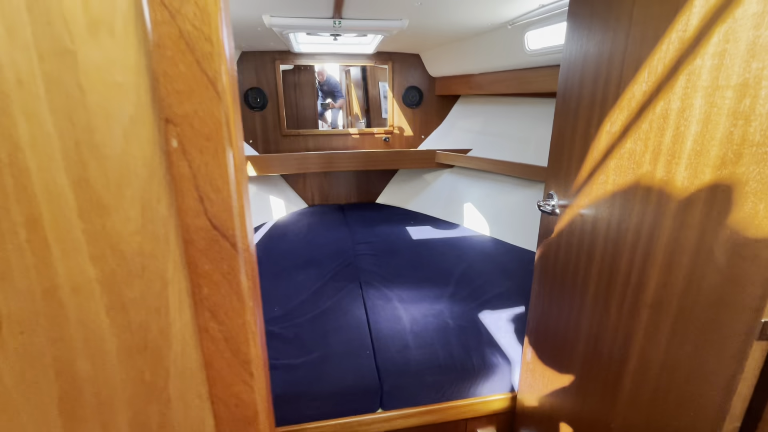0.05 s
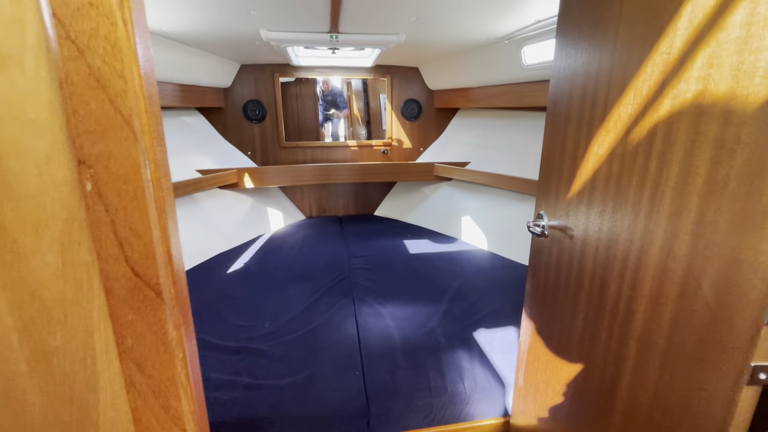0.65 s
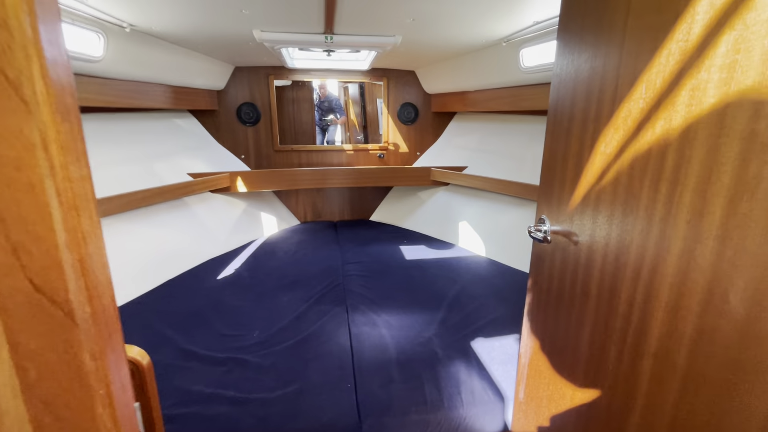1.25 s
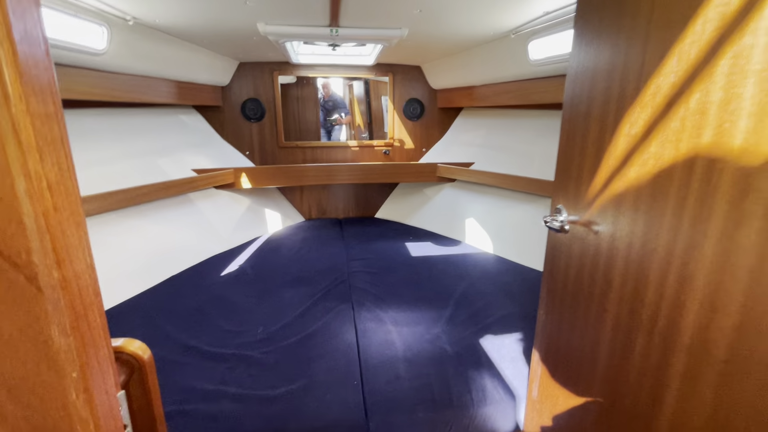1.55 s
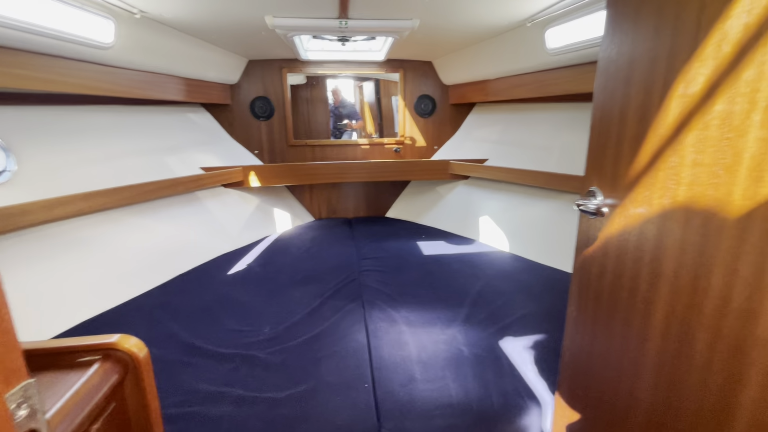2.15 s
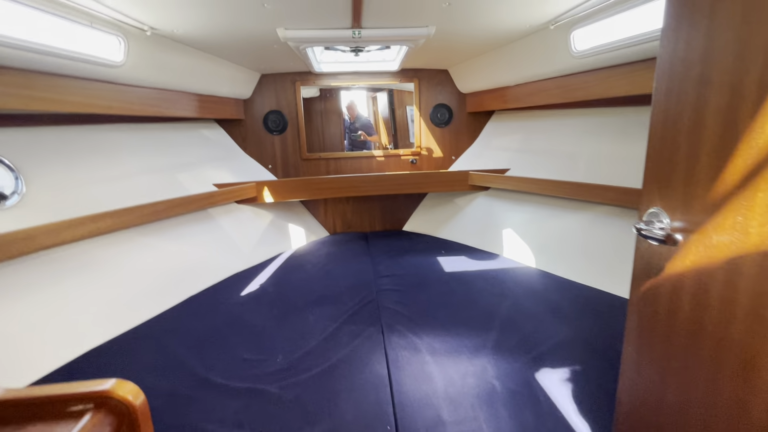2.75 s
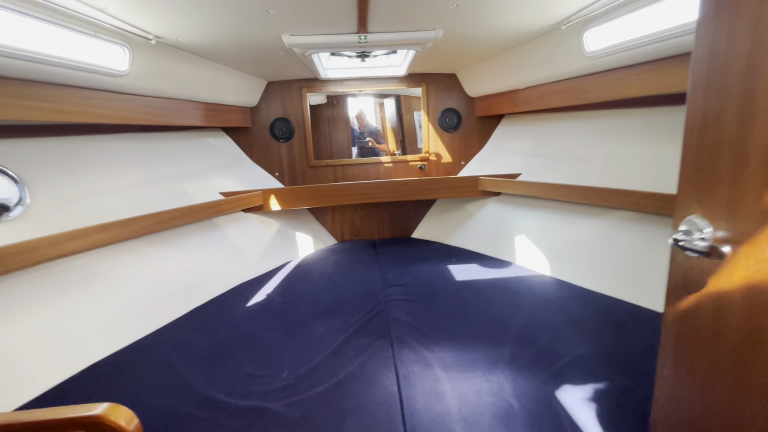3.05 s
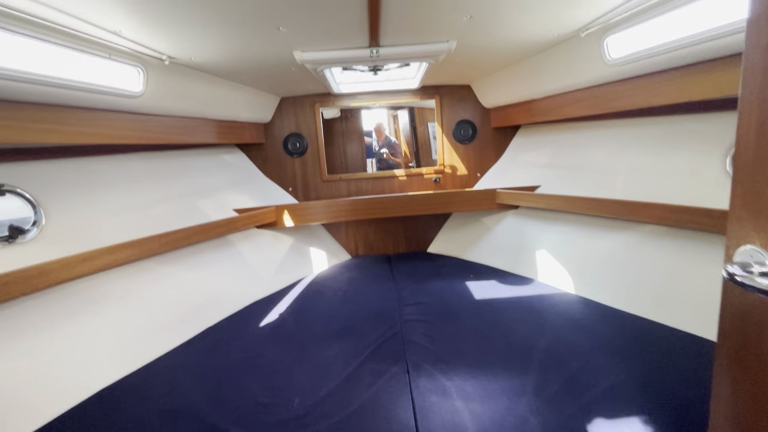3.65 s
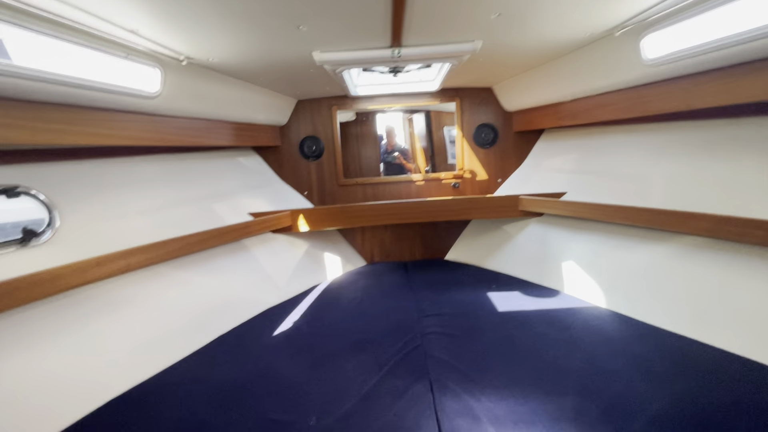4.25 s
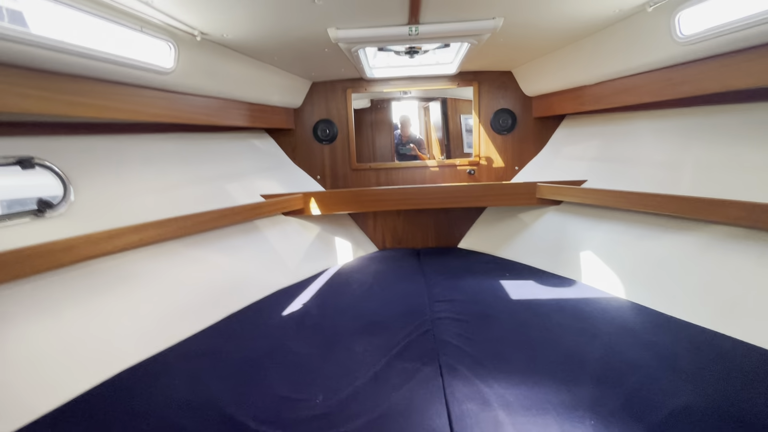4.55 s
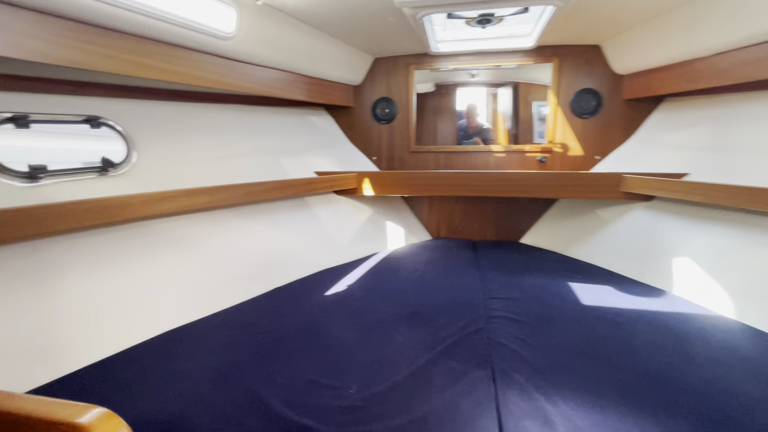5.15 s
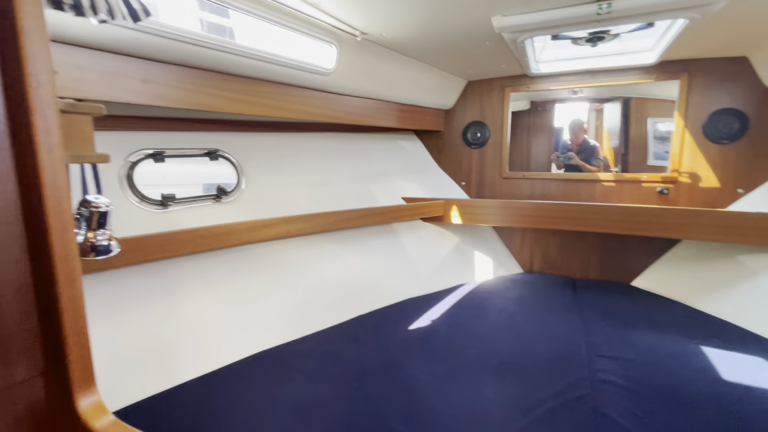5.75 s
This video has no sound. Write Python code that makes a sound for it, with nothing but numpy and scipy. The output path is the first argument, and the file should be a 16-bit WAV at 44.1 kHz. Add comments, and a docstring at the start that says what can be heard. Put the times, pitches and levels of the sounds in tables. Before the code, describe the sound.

Clothes rub through a narrow wooden doorway, with hollow footsteps, panel knocks and clacking boards over a faint low rumble.

```python
"""Squeezing into a boat's fore cabin

Someone edges through a narrow doorway into the wood-panelled cabin of a moored boat, heard close up on
a camera's two microphones. Clothes drag along the door frame and make the panel drone and judder;
steps thud on the hollow floor and loose boards clack. Right at the microphones, fingers tick and shift
on the camera body. Underneath, the hull rumbles as weight shifts."""
import sys
import numpy as np
from scipy import signal
from scipy.fft import rfft, irfft, next_fast_len
from scipy.io import wavfile

SR = 44100
rng = np.random.default_rng(int(sys.argv[2]) if len(sys.argv) > 2 else 0)


def store_wav(level_fs):
    """Save 16-bit WAV to argv[1]."""
    pcm = np.round(np.clip(np.atleast_2d(level_fs), -1, 1) * 32767)
    wavfile.write(sys.argv[1], SR, pcm.T.astype(np.int16))


N = 264148
TIME = np.arange(N) / SR

# decay of the cabin's echoes: (frequency [Hz], time to fall 60 dB [s])
CABIN_DECAY = [(150, 0.43), (400, 0.18), (1000, 0.17), (2800, 0.15), (8000, 0.28)]
# spectra of the hull's rumble and the room tone: (frequency [Hz], relative level [dB])
HULL_COLOUR = [(20, -39), (33, -9), (45, -2), (57, 8.5), (76, -4.5), (98, -5), (135, 3.5), (190, -18),
               (600, -51)]
ROOM_TONE_COLOUR = [(200, -6), (700, -5.5), (3200, -20.5), (13000, -24)]
# leans that load the hull: (middle [s], half length [s], relative rumble [dB])
LEANS = [(0.184, 0.078, -48.5), (1.223, 0.67, -61.5), (3.305, 0.82, -56), (4.826, 0.16, -58),
         (5.706, 0.19, -58)]
# strokes of clothing along the woodwork, with relative levels as each ends:
# (start [s], end [s], attack [s], swell [dB], rub [dB], fibre hiss [dB], panel drone [dB])
STROKES = [(0, 0.19, .03, 12.5, -66, -66.5, -46.5), (0.277, 0.323, 0.0056, -3.5, -54, -73, -62),
           (0.357, 0.403, 0.063, 1, -51, -55.5, -45), (0.528, 0.562, 0.024, 8, -63.5, -65.5, -57),
           (0.669, 0.87, 0.06, -2, -61.5, -65, -60.5), (0.958, 1.126, 0.11, 1, -54, -57.5, -53),
           (1.18, 1.386, 0.0033, 7, -47.5, -50.5, -43), (1.452, 1.604, 0.024, 0.5, -39.5, -55, -34),
           (1.693, 1.794, 0.17, -5.5, -43.5, -47.5, -39.5), (1.826, 1.937, 0.08, 12, -57, -61, -45),
           (2.106, 2.107, 0.067, 0.5, -44.5, -54.5, -38.5), (2.34, 2.657, 0.049, -1.5, -69.5, -67, -63.5),
           (2.7, 2.897, 0.11, -3.5, -60.5, -64, -55.5), (2.942, 2.947, 0.054, -7, -62.5, -54.5, -50.5),
           (3.047, 3.067, 0.098, 4.5, -47, -59, -38), (3.275, 3.333, 0.035, -1.5, -45.5, -60, -46),
           (3.876, 4.009, 0.24, -16.5, -87, -66, -76), (4.104, 4.207, 0.039, 6.5, -58, -72.5, -62.5),
           (4.64, 4.818, 0.75, 11.5, -61.5, -71, -55.5), (5.469, 5.622, 0.024, -6.5, -64.5, -73, -65),
           (5.702, 5.814, 0.038, 0.5, -55, -68.5, -59)]
# spectra of the cloth's rub, its fibres and their tips alone: (frequency [Hz], relative level [dB])
RUB_COLOUR = [(200, -67), (400, -4), (600, 2.5), (1100, 5), (1450, 1.5), (2200, 0), (2900, -14.5),
              (4500, -17.5), (9000, -26)]
FIBRE_COLOUR = [(1200, 1.5), (2600, 7), (3600, 3), (5200, 1), (6600, 2.5), (7700, -4), (10000, -11),
                (13000, -30)]
TIPS_COLOUR = [(1500, 2), (4500, -6.5), (7600, -0.5), (13000, -13.5)]
# door frame modes: (frequency [Hz], gain [dB])
FRAME_MODES = [(497, -3.5), (631, -1), (780, -6.5), (904, -3), (1053, -1.5), (1158, -8.5), (1367, -2),
               (1860, -5)]
# door panel modes: (frequency [Hz], width [Hz], gain [dB])
PANEL_MODES = [(236.5, 20, -1.5), (257, 39, -5.5), (306.9, 17.8, 0.5), (330.5, 48, -20.5), (381, 24, -10)]
# tilt of the panel's drone: (frequency [Hz], relative level [dB])
DRONE_COLOUR = [(80, 4.5), (200, -1.5), (1200, -3.5), (6000, -19)]
# bumps against the panelling: (time [s], pitch [Hz], level [dB])
BUMPS = [(0.045, 231, -44.5), (0.356, 323, -39.5), (0.8311, 362, -27), (0.839, 281, -22.5),
         (0.932, 343, -31.5), (1.918, 240, -31), (1.953, 280, -30.5), (2.364, 269, -43.5),
         (3.066, 336, -33), (3.261, 238, -33), (3.363, 233, -33.5), (3.394, 202, -32.5)]
# faint high clicks: (time [s], level [dB])
CLICKS = [(0.117, -55), (0.935, -60), (2.592, -62), (4.283, -66), (4.363, -57), (4.628, -49.5)]
# short scrapes: (time [s], half length [s], middle tone [Hz], level [dB])
SCUFFS = [(0.557, 0.015, 9500, -66), (0.833, 0.0022, 980, -40.5), (0.933, 0.0062, 1100, -42.5),
          (1.706, 0.049, 436, -36), (1.732, 0.018, 1090, -36), (1.802, 0.028, 606, -39),
          (2.111, 0.016, 956, -34.5), (3.298, 0.0068, 1210, -36), (3.318, 0.0069, 1200, -33),
          (3.389, 0.0073, 535, -41.5)]
# spectrum of a scrape: (frequency [times its middle tone], relative level [dB])
SCUFF_COLOUR = [(0.25, -28), (0.74, -10), (1, 0), (1.18, -8), (2, -27), (10, -43)]
# footfalls: (time [s], level [dB], brightness [dB/octave])
STEPS = [(.838, -28, 2.5), (1.548, -29.5, 9), (2.163, -37.5, 0), (2.203, -46, -7), (2.806, -44, -14.5),
         (3.444, -31, 13), (3.709, -52, -25), (3.761, -33, 12), (4.736, -35.5, -10)]
# modes of the hollow floor: (frequency [Hz], gain [dB], swell time [s])
FLOOR_MODES = [(69.5, -12, 0.018), (147.5, 3.5, 0.0047), (238, -9, 0.0031)]
# taut cloth chatters along the frame: (start [s], end [s])
CHATTERS = [(0.85, 1.57), (2.619, 2.7)]
# fabric catches on the frame as the squeeze begins: (time [s], level [dB])
CREAKS = [(1.065, -46), (1.114, -54), (1.278, -43), (1.317, -56), (1.339, -43), (1.36, -40.5), (1.414, -39)]
# spectrum of those creaks: (frequency [Hz], relative level [dB])
CREAK_COLOUR = [(300, -41), (900, 5), (2000, 3), (3200, -19), (13000, -31)]
# the panel judders where the squeeze is tightest: (time [s], pitch [Hz], level [dB])
JUDDERS = [(1.516, 245, -22), (1.554, 240, -26.5), (1.587, 301, -18.5), (1.615, 293, -19.5),
           (1.642, 294, -21.5)]
# hollow finger ticks on the camera body: (time [s], pitch [Hz], level [dB])
TICKS = [(3.411, 784, -40), (4.199, 662, -24), (5.852, 670, -42.5), (5.933, 634, -43.5)]
# clacks of loose boards: (time [s], level [dB], brightness above 1 kHz [dB/octave])
CLACKS = [(3.524, -34, -0.5), (3.797, -40.5, -3), (4.024, -36.5, -2.5), (4.809, -33, -1.9),
          (5.466, -34.5, -1)]
# spectrum of a clack: (frequency [Hz], relative level [dB])
CLACK_COLOUR = [(70, -12), (450, -7.5), (950, -3.5), (1700, -7), (3300, -14.5), (4500, -24.5),
                (7500, -31.5), (13000, -45.5)]
# modes of a loose board and of the camera body: (frequency [Hz], width [Hz], gain [dB])
BOARD_MODES = [(500, 170, -2.5), (780, 10, -1.5), (915, 79, -2.5), (1433, 19, 11), (1787, 50, 1.5),
               (2250, 170, 1.5)]
CASING_MODES = [(637, 270, 3.5), (984, 37, 3), (1950, 220, -3)]
# the left microphone hears more of the treble: (frequency [Hz], left minus right [dB])
MIC_BALANCE = [(300, 1), (1800, -2.5), (3800, 3.5), (7500, 7.5), (12000, -3)]

OPPOSED = np.array([[1], [-1]])  # opposite signs for a pair of channels


def amp(db):
    """Decibels to gain."""
    return 10 ** (np.asarray(db) / 20)


def unit(x):
    """Scale to rms 1."""
    return x / np.sqrt(np.mean(x ** 2))


def at_hz(table, f):
    """Read a table on a log-frequency axis."""
    hz, value = np.transpose(table)
    return np.interp(np.log(f + 1), np.log(hz), value)


def shape(x, response):
    """Filter by a gain that is a function of frequency."""
    size = 2 * next_fast_len(x.shape[-1] // 2 + 1)
    hz = np.arange(size // 2 + 1) * SR / size
    return irfft(rfft(x, size) * response(hz), size)[..., :x.shape[-1]]


def colour(x, table):
    """Filter by a spectrum table and scale to rms 1."""
    return unit(shape(x, lambda hz: amp(at_hz(table, hz))))


def resonate(x, modes):
    """Pass a signal through parallel resonances."""
    return sum(amp(db) * signal.lfilter(*signal.iirpeak(hz, hz / width, fs=SR), x)
               for hz, width, db in modes)


def add(out, start_s, sound):
    """Mix a sound in at its start time."""
    i = int(start_s * SR)
    out[:, i:i + sound.shape[1]] += sound[:, :N - i]


def mic_pair(pair, split_hz, likeness=0.84):
    """Two unrelated signals at two closely spaced microphones: long waves reach both alike."""
    mid, side = shape(pair, lambda hz: np.sqrt(1 + OPPOSED * likeness / (1 + (hz / split_hz) ** 4)))
    return np.array([mid + side, mid - side]) / np.sqrt(2)


def reflections():
    """Dense echoes between the cabin's close panels, at unit energy; the bass lasts longest."""
    t = TIME[:SR // 2]
    noise = mic_pair(rng.standard_normal((2, len(t))), split_hz=290)
    centres, t60s = np.transpose(CABIN_DECAY)
    tail = 0
    for share, t60 in zip(np.eye(len(centres)), t60s):
        band = shape(noise, lambda hz: at_hz(np.c_[centres, share], hz))
        tail += band * amp(-60 * t / t60)
    return unit(tail) / np.sqrt(len(t))


def in_cabin(sound, wet_db, delay_s=0.0058):
    """A sound near the microphones, followed by the echoes of the panelling."""
    response = np.pad(reflections() * amp(wet_db), ((0, 0), (int(delay_s * SR), 0)))
    response[:, 0] += 1  # the direct path
    return signal.fftconvolve(sound[None], response, axes=1)


def hull(rest_db=-67.5, room_tone_db=-75):
    """The hull rumbles all around as each lean loads it and lets go, with a thin, steady room tone."""
    rumble = colour(mic_pair(rng.standard_normal((2, N)), split_hz=560), HULL_COLOUR)
    room_tone = colour(mic_pair(rng.standard_normal((2, N)), split_hz=110), ROOM_TONE_COLOUR)
    lean_power = sum(amp(db) ** 2 * np.exp(-((TIME - s) / half_s) ** 2) for s, half_s, db in LEANS)
    sway = np.sqrt(amp(rest_db) ** 2 + lean_power)
    return rumble * sway * amp(4) + room_tone * amp(room_tone_db)


def stroke(start, end, attack_s, swell_db, release_s=0.057):
    """Gain of one stroke: it takes hold, swells or eases as the pressure changes, then slides off."""
    progress = np.clip((TIME - start) / (end - start), 0, 1)
    edges = np.maximum(start - TIME, 0) / attack_s + np.maximum(TIME - end, 0) / release_s
    return amp(swell_db * (progress - 1)) * np.exp(-edges)


def strokes():
    """Gains of rub, fibre hiss and panel drone in the doorway; overlapping strokes add in power."""
    rub, hiss, panel = amp([-84, -93.5, -74]) ** 2  # clothes at rest
    for start, end, attack_s, swell_db, rub_db, hiss_db, panel_db in STROKES:
        pressure = stroke(start, end, attack_s, swell_db)
        rub += (amp(rub_db) * pressure) ** 2
        panel += (amp(panel_db) * pressure) ** 2
        hiss += (amp(hiss_db) * stroke(start, end, attack_s, swell_db=0)) ** 2
    return np.sqrt([rub, hiss, panel])


def slips(per_s, spread_db):
    """Threads catch and let go: two streams of dense clicks of uneven size."""
    hit = rng.random((2, N)) < per_s / SR
    sign = rng.choice([-1, 1], (2, N))
    size = np.minimum(rng.exponential(size=(2, N)), 4)
    return hit * sign * amp(spread_db * size)


def snags(per_s, decay_s, depth):
    """Gain of a slide that snags now and then: each release jumps up and fades; rms 1."""
    releases = (rng.random(N) < per_s / SR) * rng.random(N)
    fading = signal.lfilter([1], [1, -np.exp(-1 / (decay_s * SR))], releases)
    return unit(1 + depth * fading)


def frame_ring(x, width_hz=12.5):
    """The lightly damped ring of the door frame."""
    return resonate(x, [(hz, width_hz, db) for hz, db in FRAME_MODES])


def cloth(rub_gain, hiss_gain, firm_db=-62, light_db=-64):
    """Fabric jerks along the frame, close by: a papery rub, coloured by the wood, and a fibre hiss."""
    firm = 1 / (1 + amp(firm_db) / rub_gain)
    # firm pressure partly evens out the snags and makes the frame ring
    jerks = snags(per_s=40, decay_s=0.007, depth=0.92) ** (1 - firm / 2) * chatter()
    catches = mic_pair(slips(per_s=5000, spread_db=1), split_hz=430) * jerks
    ringing = colour(catches + amp(10.5) * frame_ring(catches), RUB_COLOUR)
    rub = firm * ringing + (1 - firm) * colour(catches, RUB_COLOUR)
    fibres = slips(per_s=6000, spread_db=2.5) * jerks
    # the nearest panels throw the hiss back within a few milliseconds
    fibres += signal.fftconvolve(fibres, reflections()[:, :SR // 150], axes=1)[:, :N]
    # under a light touch only the fibre tips brush, and the hiss is thinner and higher
    light = 1 / (1 + (rub_gain / amp(light_db)) ** 2)
    hiss = (1 - light) * colour(fibres, FIBRE_COLOUR) + light * colour(fibres, TIPS_COLOUR)
    return rub * rub_gain * amp(1.5) + hiss * hiss_gain * amp(3.5)


def panel_drone(gain):
    """Stick and slip against the thin door panel keeps its low modes ringing."""
    catches = mic_pair(slips(per_s=650, spread_db=1.5), split_hz=380)
    return colour(resonate(catches, PANEL_MODES), DRONE_COLOUR) * gain


def soft_knock(hz, swell_s):
    """A damped resonance under a soft push: it swells to 1 and dies within a few cycles."""
    t = TIME[:SR // 4]
    age = t / swell_s
    return age ** 2 * np.exp(2 - 2 * age) * np.sin(2 * np.pi * hz * t)


def thud(hz, swell_s):
    """One low resonance in the cabin; a deep one hardly fits between the walls, so it echoes less."""
    return in_cabin(soft_knock(hz, swell_s), wet_db=-2.5 + 2 * np.log2(hz / 300))


def bumps(swell_cycles=1.3, overtone_ratio=2.7, hard_db=-20.5):
    """The body bumps the nearby panelling; harder bumps bring out an overtone."""
    out = np.zeros((2, N))
    for s, hz, db in BUMPS:
        upper_hz = hz * overtone_ratio
        hardness = amp(db - hard_db)
        overtone = amp(-10.5) * hardness * thud(upper_hz, swell_cycles / upper_hz)
        add(out, s, amp(db) * (thud(hz, swell_cycles / hz) + overtone))
    return out


def crack(hz, width_hz, decay_s):
    """A burst of bright noise that swells to rms 1 and dies at once."""
    band = [(hz, width_hz, 0)]
    noise = unit(resonate(resonate(rng.standard_normal((2, SR // 10)), band), band))
    age = TIME[:SR // 10] / decay_s
    return noise * age * np.exp(1 - age)


def clicks():
    """Faint, very short, high clicks."""
    out = np.zeros((2, N))
    for s, db in CLICKS:
        add(out, s, amp(db) * crack(hz=6900, width_hz=6200, decay_s=0.0006))
    return out


def scuffs():
    """Short gritty scrapes ring the frame, close and dry, each around its own middle tone."""
    out = np.zeros((2, N))
    grit = slips(per_s=2700, spread_db=2) * snags(per_s=42, decay_s=0.01, depth=1)
    grit += amp(7) * frame_ring(grit)
    for s, half_s, hz, db in SCUFFS:
        span = abs(TIME - s) < 0.2
        scrape = colour(grit[:, span], [(hz * ratio, level) for ratio, level in SCUFF_COLOUR])
        swell = np.exp(-((TIME[span] - s) / half_s) ** 2 / 2)
        out[:, span] += amp(db) * scrape * swell
    return out


def steps(pivot_hz=147.5):
    """Feet ring the hollow floor below the microphones; a firmer heel favours its upper modes."""
    out = np.zeros((2, N))
    for s, db, brightness in STEPS:
        for hz, mode_db, swell_s in FLOOR_MODES:
            heel_db = brightness * np.log2(hz / pivot_hz)
            add(out, s, amp(db + mode_db + heel_db) * thud(hz, swell_s))
    return out


def chatter(rate_hz=53.1, jitter=0.45, fade_db=8):
    """Gain of taut cloth that slips almost regularly and fades between slips; 1 at other times."""
    gain = np.ones(N)
    for start, end in CHATTERS:
        gaps = (1 + jitter * rng.uniform(-1, 1, 64)) / rate_hz
        slip_times = start + np.r_[0, np.cumsum(gaps)]
        taut = (TIME > start) & (TIME < end)
        last_slip = slip_times[np.searchsorted(slip_times, TIME[taut]) - 1]
        gain[taut] = unit(amp(-fade_db * rate_hz * (TIME[taut] - last_slip)))
    return gain


def creaks(swell_s=0.0032):
    """Fabric catches in the doorway: each creak is a short cluster of slips that rings the frame."""
    catches = mic_pair(slips(per_s=2500, spread_db=1), split_hz=1900)
    gain = np.zeros(N)
    for s, db in CREAKS:
        age = np.maximum(TIME - s, 0) / swell_s
        gain += amp(db) * age * np.exp(1 - age)
    return colour(catches + frame_ring(catches), CREAK_COLOUR) * gain


def panel_judder():
    """The door panel sticks and lets go a few times in uneven succession."""
    out = np.zeros((2, N))
    for s, hz, db in JUDDERS:
        add(out, s, amp(db) * in_cabin(soft_knock(hz, swell_s=0.009), wet_db=-5.5))
    return out


def through_casing(sound, left_lead_db=11.5):
    """Handling on the left of the casing pushes the two microphones in opposite directions."""
    return sound * amp(OPPOSED * left_lead_db / 2) * OPPOSED


def finger_ticks(swell_cycles=1.73):
    """Fingers tick on the hollow camera body, right at the microphones, with little echo."""
    out = np.zeros((2, N))
    for s, hz, db in TICKS:
        add(out, s, amp(db) * in_cabin(soft_knock(hz, swell_cycles / hz), wet_db=-13))
    return through_casing(out)


def loose_boards(rise_s=0.0045, scatter_db=4, ring_db=-1, snap_db=-10):
    """A loose board meets its frame with a dry snap; the clack follows by way of the walls."""
    out = np.zeros((2, N))
    shared_echoes = reflections()  # the clacks are partly alike
    rise = np.minimum(TIME[:SR // 2] / rise_s, 1)
    for s, db, brightness in CLACKS:
        echoes = (shared_echoes + reflections()) * rise
        tone = [(hz, level + brightness * max(np.log2(hz / 1000), 0)) for hz, level in CLACK_COLOUR]
        # each blow lands on another spot and favours other modes
        modes = [(hz, width, gain + scatter_db * rng.standard_normal())
                 for hz, width, gain in BOARD_MODES]
        clack = colour(echoes + amp(ring_db) * resonate(echoes, modes), tone)[:, :SR // 3]
        add(out, s, amp(db) * clack / np.std(clack[:, :SR // 40]))  # the first 25 ms set the level
        snap = crack(hz=2900, width_hz=1280, decay_s=0.0037)
        add(out, s, amp(db + snap_db + brightness) * snap)
    return out


def finger_slide():
    """Fingertips slide on the camera body and ring its casing, right at the microphones."""
    friction = slips(per_s=1300, spread_db=2.5)[0] * snags(per_s=6.3, decay_s=0.022, depth=0.34)
    hollow = unit(resonate(resonate(friction, CASING_MODES), CASING_MODES))
    pressure = stroke(start=4.1, end=4.56, attack_s=0.015, swell_db=0)
    return through_casing(hollow * pressure * amp(-61))


def scene():
    """The doorway, the cabin, handling noise, faint clicks and the hull, from the camera's position."""
    rub_gain, hiss_gain, panel_gain = strokes()
    doorway = cloth(rub_gain, hiss_gain) + creaks() + panel_drone(panel_gain) + panel_judder() + scuffs()
    cabin = steps() + bumps() + loose_boards()
    return doorway + cabin + finger_ticks() + clicks() + finger_slide() + hull()


def record(dry, roll_hz=11200, cut_hz=13400):
    """The camera's microphones differ in colour and roll off gently; the top of the treble is cut."""
    heard = shape(dry, lambda hz: amp(OPPOSED * at_hz(MIC_BALANCE, hz) / 2))
    softened = signal.sosfilt(signal.butter(4, roll_hz, fs=SR, output="sos"), heard)
    return signal.sosfilt(signal.ellip(8, 0.2, 70, cut_hz, fs=SR, output="sos"), softened)


dry = scene()
out = record(dry)
store_wav(out)
```